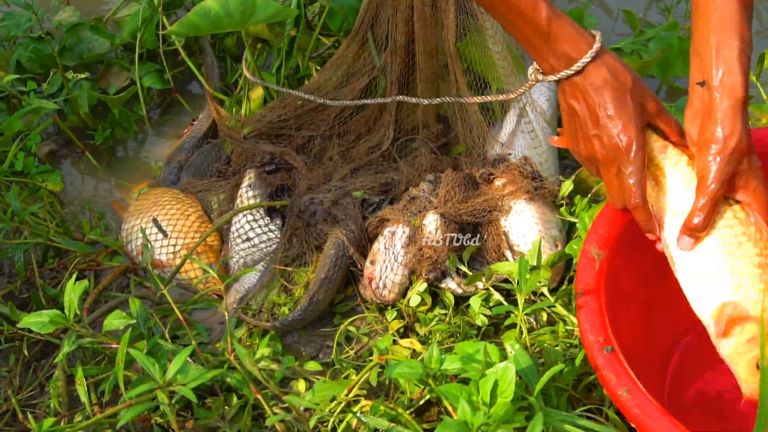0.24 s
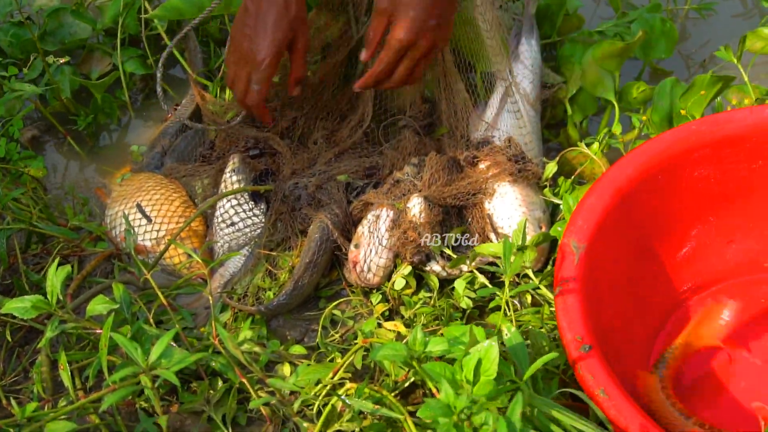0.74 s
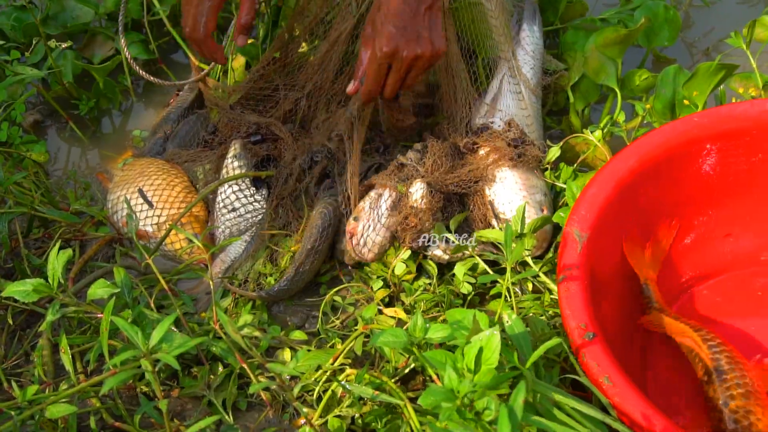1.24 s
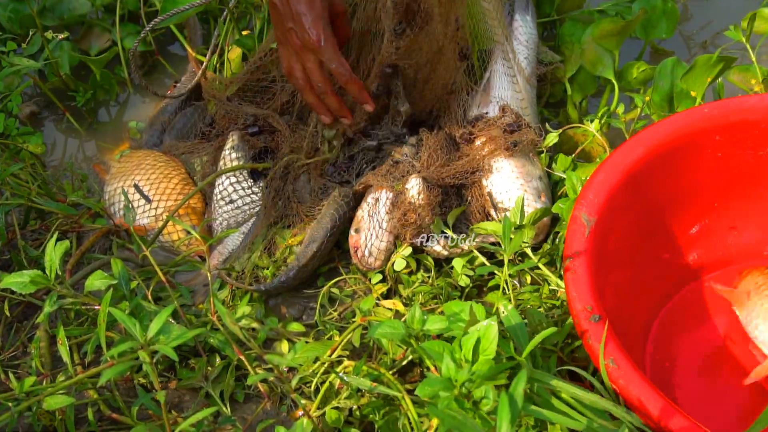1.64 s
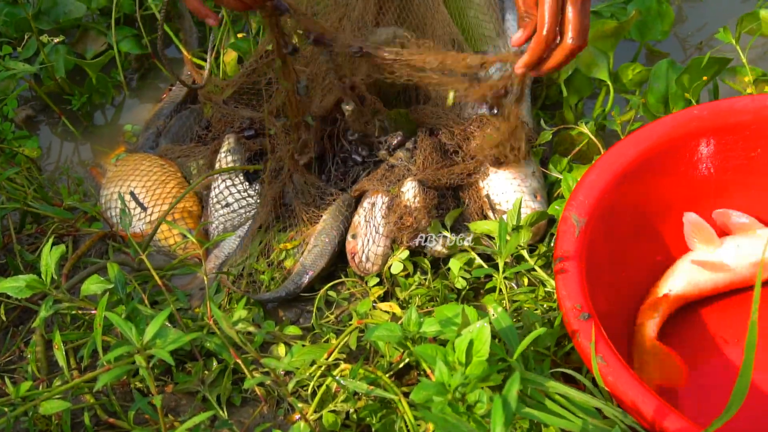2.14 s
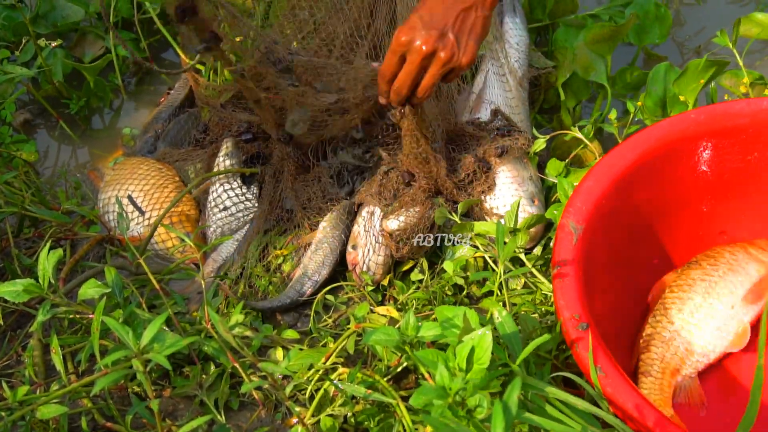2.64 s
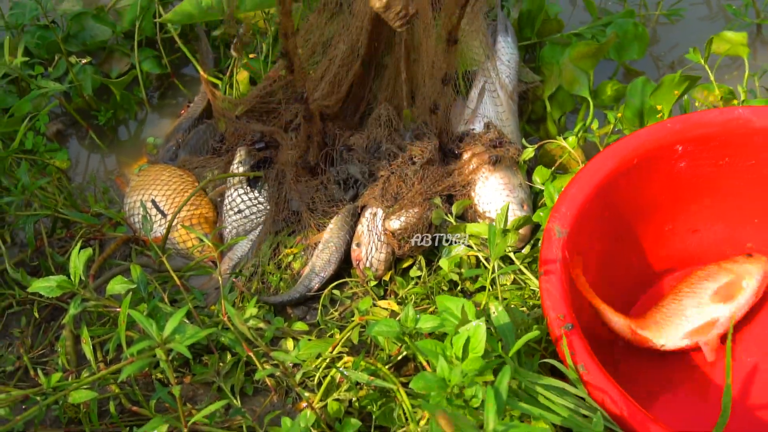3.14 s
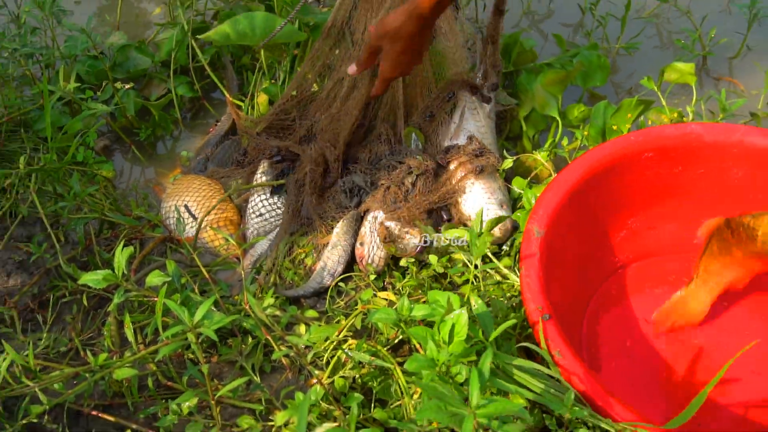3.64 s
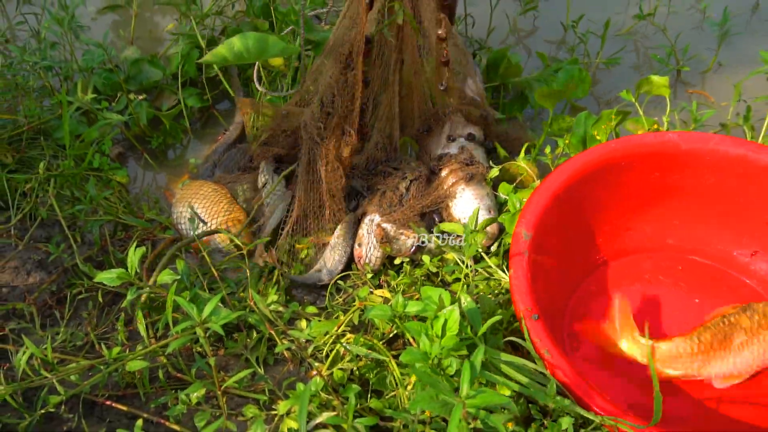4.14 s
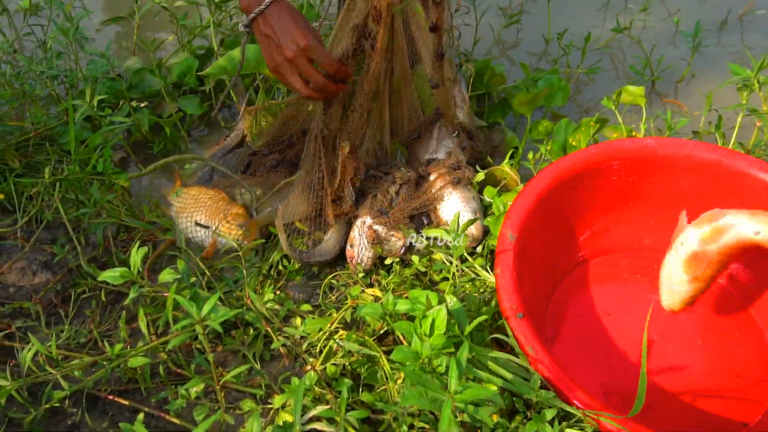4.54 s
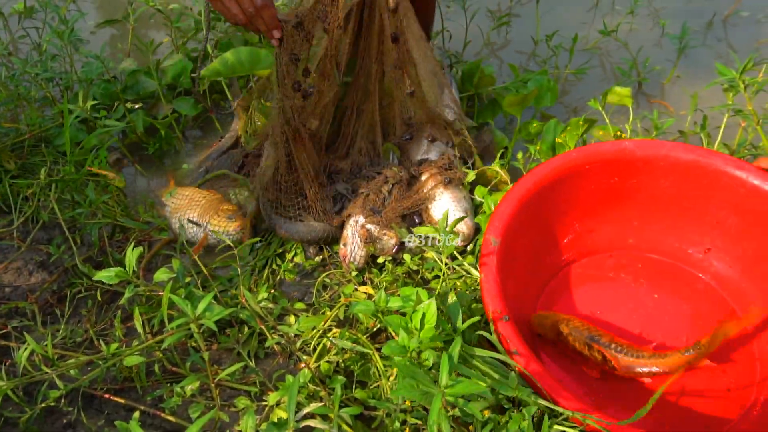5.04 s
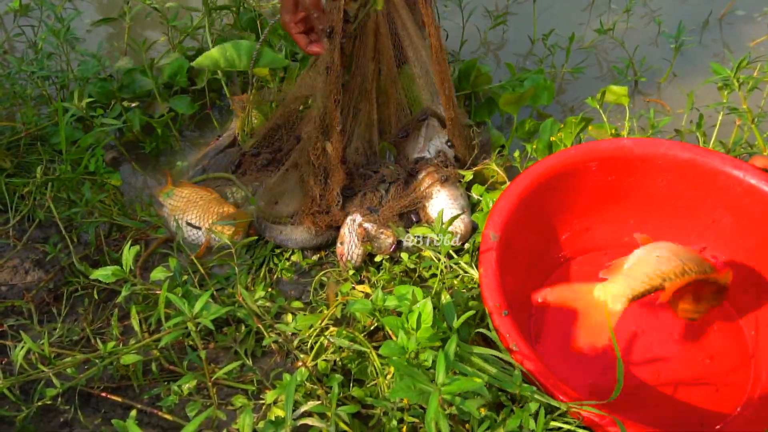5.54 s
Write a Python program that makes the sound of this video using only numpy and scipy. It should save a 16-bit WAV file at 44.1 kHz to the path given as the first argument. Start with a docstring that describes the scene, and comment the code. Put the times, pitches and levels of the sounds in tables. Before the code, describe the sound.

Quiet low outdoor rumble runs throughout, with wet, grainy net rustling on grass and skin rubbing plastic. At about 0.2 s a fish begins thrashing in a plastic basin to the right: quick thuds, hollow pops and a sharp wet smack near 0.5 s. From 0.7 to 1.7 s it is calmer, with light flaps, net dragging, a tiny squeak near 1.05 s and a faint far bird. A strong hollow flop comes at 1.85 s, then drips around 2 s, slaps at 2.3 and 2.5 s, and two small squeaks at 2.7 s. Heavy wet slaps hit around 2.9 s and a hard splashy landing at 3.4 s. A fin chatters rapidly from 3.4 to 3.7 s. Dense flopping fills 3.75 to 4.5 s, loudest near 4.0 s, while rubbing swells. Faint birds chirp around 4 to 4.7 s. More slaps follow from 4.85 to 5.5 s, then knot ticks and a last light flap near 5.8 s.

```python
"""Low outdoor rumble throughout (shaped noise), with wet rubbing and net dragging (grainy noise).
From 0.2 s a live fish thrashes in a plastic basin: thuds (damped sines), modal ringing, air pops
and smacks (noise bursts); spray hisses on the right. Then far birds (gliding noise bands), drops
(rising tones), squeaks (gliding tones), net-knot ticks and, from 3.4 s, a fin chattering (blips)."""
import sys
import numpy as np
from scipy import signal
from scipy.fft import rfft, irfft
from scipy.io import wavfile
from scipy.ndimage import uniform_filter1d

SR = 44100
rng = np.random.default_rng(int(sys.argv[2]) if len(sys.argv) > 2 else 0)


def materialize(psi):
    """Save the field psi as 16-bit PCM at rate SR to the path in sys.argv[1].

    A 1-D psi becomes a single channel; in a 2-D psi each row is a channel.
    """
    bounded = np.clip(np.atleast_2d(psi).T, -1, 1)
    quanta = np.round(bounded * 32767).astype(np.int16)
    wavfile.write(sys.argv[1], SR, quanta)


N = 255780
LEAD_S = 0.02  # position of the peak in every burst buffer


def gain_of(db):
    """Decibels to gain."""
    return 10 ** (np.asarray(db) / 20)


def evened(x):
    """Scales to rms 1."""
    return x / np.sqrt(np.mean(x ** 2) + 1e-20)


def read(points, hz):
    """Reads a spectrum on a log-frequency axis."""
    f, value = np.transpose(points)
    return np.interp(np.log(hz + 1), np.log(f + 1), value)


def level_curve(points):
    """Gain over the scene, interpolated in dB."""
    return gain_of(np.interp(np.arange(N) / SR, *np.transpose(points)))


def add(mix, s, sound):
    """Mixes a sound in at s seconds."""
    part = mix[..., round(s * SR):][..., :sound.shape[-1]]
    part += sound[..., :part.shape[-1]]


def band(x, lo_hz, hi_hz):
    """Causal band-pass."""
    sos = signal.butter(2, [lo_hz, min(hi_hz, SR / 2.1)], "band", fs=SR, output="sos")
    return signal.sosfilt(sos, x)


def burst(scale_s, rise_share, fall_share):
    """Time from the peak, and an envelope with a rounded swell and an exponential fall."""
    t = np.arange(round(.12 * SR)) / SR - LEAD_S
    scale_s = max(scale_s, .001)
    rise = np.exp(-(t / (rise_share * scale_s)) ** 2)
    fall = np.exp(-np.maximum(t, 0) / (fall_share * scale_s))
    return t, np.where(t < 0, rise, fall)


def crackly(noise):
    """Level that jumps from droplet to droplet within a splash."""
    return gain_of(1.95 * evened(uniform_filter1d(noise, 25)))


def shaped(noise, shape):
    """Noise under an envelope, carrying the envelope's own energy."""
    cut = noise * shape
    return cut * np.sqrt(np.sum(shape ** 2) / np.mean(np.sum(cut ** 2, axis=-1)))


def grainy(per_s, spread_db, grain_s):
    """Level that jumps with many tiny random slips."""
    size = gain_of(spread_db * np.minimum(rng.exponential(1, N), 4))
    slips = size * (rng.random(N) < per_s / SR)
    return evened(.5 + signal.lfilter([1], [1, -np.exp(-1 / (grain_s * SR))], slips))


# left-right coherence of diffuse noise: (frequency [Hz], likeness [0-1])
COHERENCE = [(130, 1), (290, 0.93), (640, 0.51), (1400, 0.32), (15000, 0.1)]


def haze(spectrum, patchy_db):
    """Two-channel noise of the given colour with drifting patches, rms 1."""
    frames, hz = N // 256 + 5, np.fft.rfftfreq(1024, 1 / SR)
    a, b, c, d, patches = rng.standard_normal((frames, 513, 5)).T
    patches = uniform_filter1d(patches, size=40, axis=0)  # over frequency
    patches = evened(uniform_filter1d(patches, size=5, axis=1))  # over time
    same = np.clip(read(COHERENCE, hz), -1, 1)[:, None]
    left, other = a + 1j * b, c + 1j * d
    z = np.array([left, same * left + np.sqrt(1 - same ** 2) * other])
    z *= gain_of(read(spectrum, hz)[:, None] + patchy_db * patches)
    return evened(signal.istft(z, nperseg=1024, noverlap=768)[1][:, :N])


# outdoor air colour: (frequency [Hz], relative density [dB per Hz])
AIR_SPECTRUM = [(18, -44), (30, -29), (66, 2), (100, -3.5), (199, -10), (526, -27.5), (1280, -29.5),
                (4650, -33.5), (8980, -46), (16000, -52)]
AIR_DB = -41.5


def air():
    """Outdoor rumble: diffuse noise weighted to the bass."""
    return gain_of(AIR_DB) * haze(AIR_SPECTRUM, patchy_db=1.0)


# skin-on-plastic colour: (frequency [Hz], relative density [dB per Hz])
RUB_SPECTRUM = [(300, 12), (600, 6.5), (900, 13), (1500, 2.5), (2500, 10), (3600, 3), (5000, -16)]
# net-on-grass colour: (frequency [Hz], relative density [dB per Hz])
RUSTLE_SPECTRUM = [(2500, 5.5), (4500, 3.5), (6500, 1.5), (9000, 3), (13000, 0.5), (16000, -2.5)]
# body rubbing the basin between flaps: (time [s], level [dB])
RUB_LEVEL = [(0.0, -72), (0.3, -49), (0.9, -45), (1.35, -52.5), (1.92, -45), (2.23, -55), (2.86, -46),
             (3.4, -41.5), (3.62, -46), (4.15, -37), (4.33, -44.5), (4.49, -33.5), (4.73, -60), (4.99, -56),
             (5.3, -42.5), (5.8, -56)]
# wet net dragging over grass: (time [s], level [dB])
DRAG_LEVEL = [(0.0, -56.5), (0.55, -56.5), (0.75, -46), (0.95, -55), (1.03, -40), (1.07, -48.5),
              (1.255, -57), (1.275, -45.5), (1.43, -49), (1.47, -54.5), (1.68, -47.5), (2.23, -46),
              (2.5, -50), (2.86, -45.5), (3.7, -47.5), (4.33, -53), (4.49, -48), (4.7, -53.5),
              (4.95, -44.5), (5.3, -55), (5.8, -52.5)]
SLITHER_RUB_DB, SLITHER_RUSTLE_DB = -18, -28.5  # re the landing


def sliding():
    """Wet body rubs the plastic and the net drags over the grass, in fine grains."""
    rub_grain = grainy(per_s=400, spread_db=3.1, grain_s=0.0029)
    rub = haze(RUB_SPECTRUM, patchy_db=3.0) * rub_grain * gain_of([[-1.5], [1.5]])
    rustle_grain = grainy(per_s=300, spread_db=2.1, grain_s=0.0051)
    rustle = haze(RUSTLE_SPECTRUM, patchy_db=1.2) * rustle_grain * gain_of([[-1.6], [1.6]])
    moving = slither()
    rub_gain = np.hypot(level_curve(RUB_LEVEL), gain_of(SLITHER_RUB_DB) * moving)
    rustle_gain = np.hypot(level_curve(DRAG_LEVEL), gain_of(SLITHER_RUSTLE_DB) * moving)
    return rub_gain * rub + rustle_gain * rustle


# heavy landings on the basin floor: (time of peak [s], landing level [dB], pitch [Hz])
LANDINGS = [(0.22, -32, 175), (0.36, -26.5, 220), (0.37, -26.5, 320), (0.498, -34, 159), (0.523, -31, 250),
            (1.85, -23.5, 327), (2.084, -35, 190), (2.1, -34, 200), (2.242, -30.5, 209), (2.306, -26, 395),
            (2.532, -22.5, 203), (2.874, -21.5, 145), (2.929, -25, 159), (3.199, -35, 296),
            (3.373, -17, 236), (3.76, -31.5, 185), (3.795, -31, 188), (3.834, -21, 282),
            (4.004, -20.5, 274), (4.14, -26, 200), (4.281, -26, 304), (4.424, -22.5, 226),
            (4.849, -31, 266), (4.925, -26, 136), (5.176, -28, 292), (5.378, -28, 266), (5.447, -28.5, 136)]
GIVE_DB, SQUELCH_DB = 8, -5.5  # re the landing


def thuds():
    """The wall gives for a cycle or two under the body, with a dull squelch."""
    out = np.zeros(N)
    for s, db, hz in LANDINGS:
        t, shape = burst(1 / hz, rise_share=0.43, fall_share=0.76)
        give = shape * np.sin(2 * np.pi * hz * t + 1.93)
        squelch_shape = burst(0.0047, rise_share=0.063, fall_share=3.8)[1]
        squelch = evened(band(rng.standard_normal(len(t)), 158, 337)) * squelch_shape
        add(out, s - LEAD_S, gain_of(db + GIVE_DB) * give + gain_of(db + SQUELCH_DB) * squelch)
    return out


def slither():
    """Swell of movement that leads into each landing and dies after it."""
    t = np.arange(N) / SR
    rise_s, fall_s = 0.028, 0.052
    moving = np.zeros(N)
    for s, db, _ in LANDINGS:
        moving += gain_of(db) * np.exp(-abs(t - s) / np.where(t < s, rise_s, fall_s))
    return moving


# basin modes: (frequency [Hz], level re the landing before the strike-spot gain [dB], t60 [s])
BASIN_MODES = [(140.8, -14, 0.15), (332, -12.5, 0.056), (669, -18, 0.13), (1440, -26, 0.064)]


def basin():
    """Each landing leaves the basin ringing in its own modes, struck at a different spot."""
    out, t = np.zeros(N), np.arange(SR // 4) / SR
    spots = rng.uniform(0.36, 4.1, (len(LANDINGS), len(BASIN_MODES)))  # gain per mode
    onset = 1 - np.exp(-t / 0.0002)
    for (s, landing_db, _), spot in zip(LANDINGS, spots):
        ring = np.zeros(len(t))
        for gain, (hz, db, t60_s) in zip(spot, BASIN_MODES):
            ring += gain * gain_of(db - 60 * t / t60_s) * np.sin(2 * np.pi * hz * t)
        add(out, s, gain_of(landing_db) * ring * onset)
    return out


# flaps: (time of peak [s], air pop level [dB], nominal pop pitch [Hz], smack level [dB],
# half length [s], envelopes use at least 1 ms)
FLAPS = [(0.222, -49, 504, -51, 0.021), (0.355, -16, 471, -61, 0.0039), (0.412, -31, 623, -57, 0.0046),
         (0.494, -16.5, 936, -21, 0.0021), (0.504, -26, 1440, -15.5, 0.0012),
         (0.515, -33, 600, -53, 0.0087), (0.544, -18, 980, -52, 0.00086), (0.707, -28.5, 1680, -39, 0.0025),
         (0.861, -27.5, 917, -34.5, 0.0033), (1.155, -31.5, 1275, -43, 0.0039),
         (1.728, -29, 682, -38.5, 0.0056), (1.846, -8.5, 768, -47, 0.0027), (1.877, -27, 840, -34, 0.0017),
         (2.199, -30, 875, -41, 0.0028), (2.241, -33, 850, -37, 0.0033), (2.306, -19.5, 676, -32, 0.0027),
         (2.321, -24, 738, -33, 0.0048), (2.343, -44, 1532, -20, 0.0018), (2.479, -32, 940, -58, 0.0027),
         (2.531, -13.5, 860, -24.5, 0.0012), (2.607, -31, 646, -40, 0.0066),
         (2.785, -28.5, 860, -22, 0.0026), (2.815, -27.5, 796, -42, 0.0062), (2.857, -33, 890, -40, 0.0041),
         (2.871, -13.5, 1100, -18.5, 0.0018), (2.93, -17.5, 675, -21.5, 0.0033),
         (3.003, -32, 977, -38.5, 0.0061), (3.043, -18, 778, -22.5, 0.0042), (3.067, -26, 627, -49, 0.0018),
         (3.194, -15, 660, -37, 0.0016), (3.322, -22, 794, -54, 0.0025), (3.365, -19, 700, -27, 0.0061),
         (3.757, -19, 444, -47, 0.00086), (3.768, -30, 932, -45, 0.0082),
         (3.811, -22.5, 940, -24.5, 0.0032), (3.821, -19, 890, -24.5, 0.0036),
         (3.832, -17, 692, -24, 0.0043), (3.874, -24, 700, -48, 0.00066), (3.92, -26, 653, -48, 0.0063),
         (4.004, -7, 608, -58, 0.0015), (4.126, -17.5, 876, -25.5, 0.0072),
         (4.149, -19.5, 617, -20.5, 0.0037), (4.204, -27.5, 665, -39, 0.0037),
         (4.222, -25, 1370, -26.5, 0.0031), (4.279, -14.5, 880, -24, 0.0025),
         (4.332, -27, 1284, -19, 0.0037), (4.422, -40.5, 985, -31.5, 0.013),
         (4.841, -17.5, 745, -20.5, 0.0018), (4.884, -30.5, 910, -33, 0.0061),
         (4.901, -10.5, 1870, -27, 0.0014), (4.915, -29, 1210, -31, 0.0093), (5.034, -36, 710, -56, 0.0047),
         (5.164, -16, 1300, -19.5, 0.0014), (5.17, -14.5, 710, -36, 0.0038), (5.375, -19, 665, -29, 0.0025),
         (5.383, -22, 990, -18.5, 0.0019), (5.49, -24.5, 648, -29, 0.005), (5.785, -33.5, 896, -36, 0.0081)]
# smack passband: (low edge [Hz], high edge [Hz])
SMACK_BAND_HZ = (1200, 4570)


def flaps():
    """Pop of cupped air and a noisy wet smack for each flap."""
    out = np.zeros(N)
    for s, pop_db, hz, smack_db, half_s in FLAPS:
        t, shape = burst(half_s, rise_share=0.85, fall_share=2.04)
        noise = rng.standard_normal((4, len(t)))
        wobble = 1 + 1.145 * uniform_filter1d(noise[0], 40)  # the air pocket changes size as it is squeezed
        turns = np.cumsum(hz * wobble) / SR
        turns -= turns[round(LEAD_S * SR)]
        slosh = min(110 * half_s, 1.6) * evened(band(noise[1], 222, 1560))  # slow flaps slosh more
        pop = shape * (slosh - np.cos(2 * np.pi * turns))
        wet = band(noise[2] * crackly(noise[3]), *SMACK_BAND_HZ)
        wet = band(wet, *SMACK_BAND_HZ)  # second pass steepens the edges
        smack = shaped(wet, burst(half_s, rise_share=0.81, fall_share=0.93)[1])
        add(out, s - LEAD_S, gain_of(pop_db) * pop + gain_of(smack_db) * smack)
    return out


def ticks(table, side_db, lo_hz, hi_hz):
    """Short sharp hisses of water; droplet size shifts the colour from one to the next."""
    out = np.zeros((2, N))
    sides_db = np.array([[side_db / 2], [-side_db / 2]])
    for s, db, half_s in table:
        t, shape = burst(half_s, rise_share=0.33, fall_share=1.38)
        shape = shape * np.exp(-(t / (2.53 * half_s)) ** 2)
        common, left, right, grain = rng.standard_normal((4, len(t)))
        water = (common + 1.33 * np.array([left, right])) * crackly(grain)
        hiss = band(water, lo_hz * rng.uniform(0.66, 0.92), hi_hz)
        add(out, s - LEAD_S, gain_of(db + sides_db) * shaped(hiss, shape))
    return out


# spray: (time of peak [s], level [dB], half length [s])
SPRAY = [(0.352, -36.5, 0.0034), (0.487, -37, 0.006), (0.502, -21.5, 0.0018), (0.748, -31.5, 0.0014),
         (0.863, -35.5, 0.004), (1.154, -25, 0.0008), (1.436, -38.5, 0.0018), (1.599, -25.5, 0.00084),
         (1.687, -35, 0.002), (1.7, -30, 0.0018), (1.729, -21.5, 0.00075), (1.839, -33.5, 0.0027),
         (2.276, -23.5, 0.0016), (2.303, -25.5, .0023), (2.34, -31.5, 0.0026), (2.785, -22.5, 0.003),
         (2.93, -31.5, 0.01), (3.007, -25.5, 0.0029), (3.04, -20.5, .004), (3.369, -15.5, 0.00087),
         (3.392, -17.5, 0.0016), (3.803, -25.5, 0.0012), (3.812, -32, .001), (3.817, -25, 0.0025),
         (3.836, -29, 0.0013), (4.123, -32, 0.012), (4.143, -27.5, 0.014), (4.221, -25.5, 0.0036),
         (4.235, -24, 0.0018), (4.332, -20, 0.0032), (4.391, -30.5, .001), (4.424, -32.5, 0.0038),
         (4.472, -24.5, 0.0022), (4.523, -28.5, 0.0022), (4.539, -37, 0.0014), (4.742, -27, 0.0037),
         (4.771, -37, 0.003), (4.837, -21.5, 0.0032), (4.901, -26, .0025), (4.913, -30.5, 0.013),
         (5.178, -32.5, 0.0028), (5.203, -40, 0.0024), (5.379, -24, 0.0058), (5.444, -33, 0.0061),
         (5.49, -26, 0.0035), (5.532, -36, 0.0027), (5.779, -26, 0.0039)]


def spray():
    """Droplets flung out of the basin, on the right: brief bright noise bursts."""
    return ticks(SPRAY, side_db=-5.5, lo_hz=3060, hi_hz=13500)  # left minus right


# far calls: (start [s], length [s], start pitch [Hz], end pitch [Hz], level [dB])
BIRD_CALLS = [(0.763, 0.17, 2440, 2675, -51), (1.53, 0.29, 2550, 2774, -56),
              (3.949, 0.027, 4400, 3500, -46), (3.973, 0.025, 4330, 3100, -50),
              (4.34, 0.096, 3530, 2670, -48), (4.609, 0.06, 3195, 3570, -43),
              (4.651, 0.045, 2700, 3020, -43), (4.666, 0.07, 3400, 2239, -45),
              (5.274, 0.045, 4000, 3450, -49.5)]


def airy_calls():
    """Narrow bands of breathy noise that glide in pitch, then scatter."""
    out = np.zeros(N)
    for s, length_s, start_hz, end_hz, db in BIRD_CALLS:
        count = round(length_s * SR)
        turns = 2 * np.pi * np.cumsum(np.geomspace(start_hz, end_hz, count)) / SR
        slow = uniform_filter1d(rng.standard_normal((2, count)), 75)
        a, b = evened(uniform_filter1d(slow, 45))
        call = a * np.cos(turns) + b * np.sin(turns)
        add(out, s, gain_of(db) * call * signal.windows.tukey(count, .6))
    taps = rng.standard_normal(3000) * (rng.random(3000) < .004)  # scattered by the banks
    taps *= np.exp(-np.arange(3000) / 1500)
    return out + 0.99 * signal.oaconvolve(out, taps / np.linalg.norm(taps + 1e-9))[:N]


# drops off net and hands: (time of peak [s], level [dB], pitch [Hz])
DROPS = [(0.813, -31.5, 2460), (1.613, -36.5, 2520), (1.807, -35, 1800), (1.906, -41, 2000),
         (1.954, -37, 1620), (1.966, -39.5, 750), (1.986, -33.5, 2300), (2.0, -39.5, 810),
         (2.024, -40, 2700), (2.254, -39, 890), (4.526, -36, 2130)]
DROP_CYCLES, DROP_RISE_PER_S = 6.1, 7.4


def drops():
    """A few cycles of rising pitch with a little splat."""
    out = np.zeros(N)
    for s, db, hz in DROPS:
        t, shape = burst(DROP_CYCLES / hz, rise_share=0.54, fall_share=1.0)
        plop = np.sin(2 * np.pi * hz * t * (1 + DROP_RISE_PER_S * t))
        splat = evened(band(rng.standard_normal(len(t)), 0.68 * hz, 1.17 * hz))
        add(out, s - LEAD_S, gain_of(db) * shape * (plop + 0.56 * splat))
    return out


# wet skin squeaks: (start [s], length [s], start pitch [Hz], end pitch [Hz], initial level [dB])
SQUEAKS = [(1.055, 0.043, 938, 1204, -37), (2.713, 0.017, 1410, 1070, -30),
           (2.747, 0.023, 1295, 1050, -28.5)]


def squeaks():
    """Short gliding tones with jittery pitch and a weak octave, fading as they go."""
    out = np.zeros(N)
    for s, length_s, start_hz, end_hz, db in SQUEAKS:
        u = np.arange(0, 1, 1 / (length_s * SR))
        jitter = 1 + 0.35 * uniform_filter1d(rng.standard_normal(len(u)), 90)
        hz = start_hz * (end_hz / start_hz) ** u * jitter
        turns = 2 * np.pi * np.cumsum(hz) / SR
        tone = np.sin(turns) + 0.19 * np.sin(2 * turns)
        add(out, s, gain_of(db - 11.0 * u) * tone * signal.windows.tukey(len(u), .5))
    return out


# net knots: (time of peak [s], level [dB], half length [s])
KNOTS = [(1.415, -36, 0.0016), (1.583, -28, 0.00084), (1.632, -33, .001), (2.057, -30.5, 0.0036),
         (2.096, -35.5, 0.0016), (2.128, -39, .0015), (2.284, -33.5, 0.017), (2.407, -20.5, 0.0016),
         (2.617, -28.5, .001), (2.776, -24, 0.0013), (3.269, -22, 0.00085), (3.443, -18.5, .001),
         (3.533, -32, 0.0037), (3.594, -25, 0.0029), (3.631, -24, 0.0023), (3.686, -30.5, 0.005),
         (3.712, -26.5, 0.00083), (3.899, -31.5, .001), (3.938, -31.5, 0.0028), (4.261, -25.5, 0.0022),
         (4.618, -25, 0.0015), (4.697, -37, 0.002), (5.027, -23.5, 0.002), (5.698, -19.5, 0.003),
         (5.754, -31.5, .001)]


def knots():
    """Wet net knots ticking, near the centre: brief high noise bursts."""
    return ticks(KNOTS, side_db=0.5, lo_hz=5730, hi_hz=13200)  # left minus right


# fin slips along the plastic: (time of peak [s], level [dB])
FIN_SLIPS = [(3.442, -28), (3.456, -31), (3.47, -30.5), (3.483, -27), (3.494, -31), (3.511, -30.5),
             (3.547, -28), (3.562, -33), (3.573, -33), (3.597, -33), (3.605, -31), (3.625, -40),
             (3.645, -33), (3.66, -28), (3.673, -30.5), (3.697, -29), (3.714, -34), (4.63, -39),
             (4.69, -36.5)]
CHATTER_HZ = 950  # nominal, varied per slip


def chatter():
    """Each slip of the fin is a few cycles with a rough overtone and some scrape."""
    out = np.zeros(N)
    for s, db in FIN_SLIPS:
        t, shape = burst(0.0025, rise_share=0.91, fall_share=0.63)
        hz = CHATTER_HZ * rng.uniform(0.87, 1.06)
        turns = 2 * np.pi * hz * t * (1 - 7.9 * t)  # sags as it slips
        scrape = 0.25 * evened(band(rng.standard_normal(len(t)), 1070, 2200))
        overtone = 0.29 * np.sin(2.18 * turns)
        add(out, s - LEAD_S, gain_of(db) * shape * (np.sin(turns) + scrape + overtone))
    return out


# basin placement: (frequency [Hz], left minus right [dB])
BASIN_SIDE = [(250, 0.5), (800, -2.5), (1500, -6), (3000, -9)]


def from_basin(x):
    """The basin stands to the right: the left channel gets it duller and 30 us late."""
    hz = np.fft.rfftfreq(N, 1 / SR)
    side_db = read(BASIN_SIDE, hz)
    left = gain_of(side_db / 2) * np.exp(-2j * np.pi * hz * .00003)
    return irfft(rfft(x) * np.array([left, gain_of(-side_db / 2)]), N)


def echoes(x):
    """Short scattered reflections from basin walls, ground and bodies."""
    t = np.arange(round(.1 * SR)) / SR
    taps = rng.standard_normal((2, len(t))) * (rng.random((2, len(t))) < .05)
    taps *= gain_of(-60 * t / 0.086) * (t > .002)  # t60 86 ms, 2 ms gap
    wet = signal.oaconvolve(x, taps / np.linalg.norm(taps[0]), axes=1)[:, :N]
    return band(wet, 680, 16000)


def scene():
    """Fish, spray and net up close; birds and air far off."""
    fish = thuds() + basin() + flaps() + drops() + squeaks() + chatter()
    close = from_basin(fish) + spray() + knots()
    return air() + sliding() + close + gain_of(-12.5) * echoes(close) + airy_calls()


def record(dry):
    """Small microphone ports lose the deepest bass; then a 16.6 kHz band limit."""
    thin = signal.sosfilt(signal.butter(2, 45., "high", fs=SR, output="sos"), dry)
    lowpass = signal.firwin(511, 16600, window=("kaiser", 9), fs=SR)
    return signal.oaconvolve(thin, lowpass[None], "same")


dry = scene()
out = record(dry)
materialize(out)
```